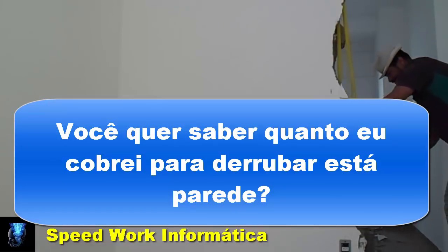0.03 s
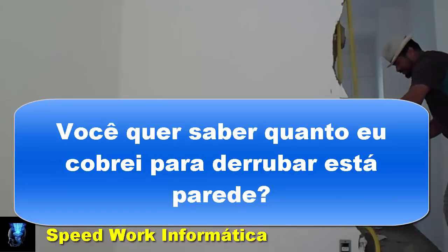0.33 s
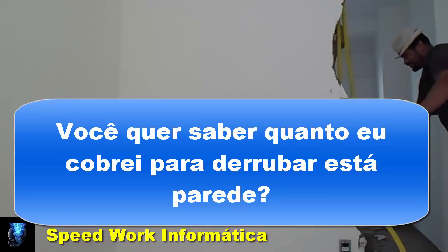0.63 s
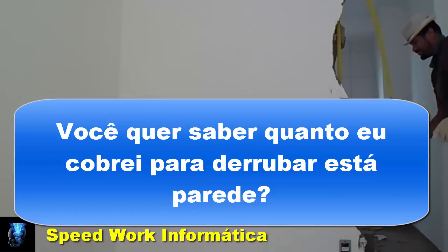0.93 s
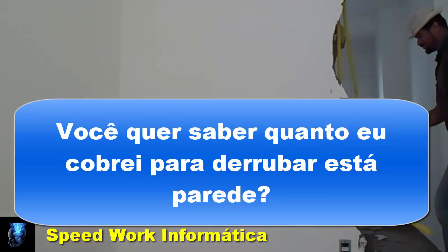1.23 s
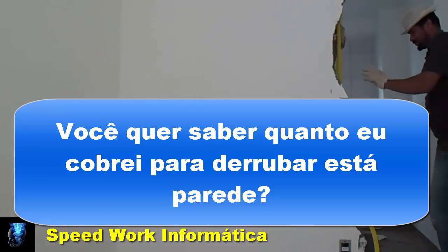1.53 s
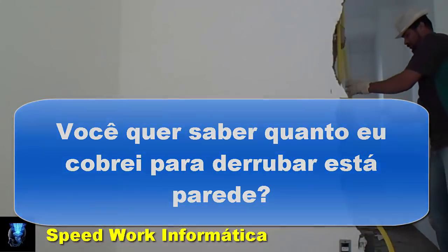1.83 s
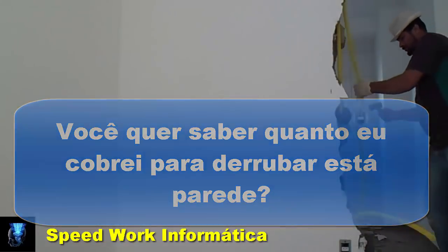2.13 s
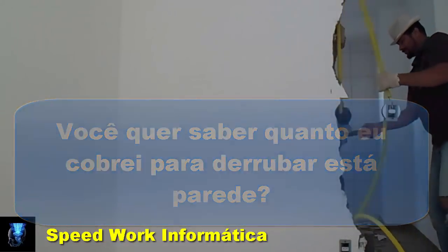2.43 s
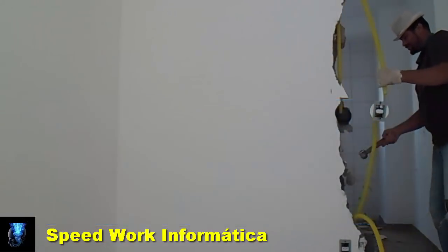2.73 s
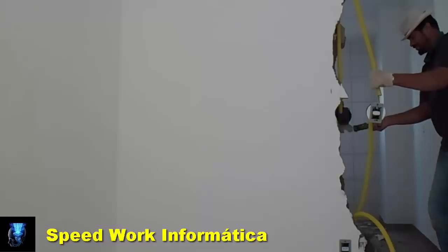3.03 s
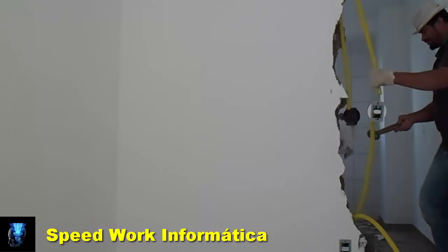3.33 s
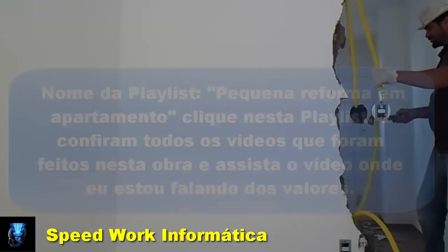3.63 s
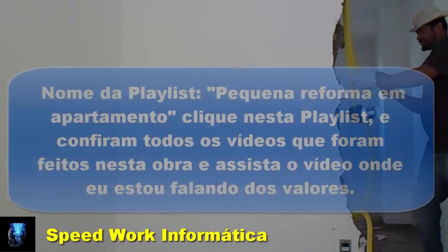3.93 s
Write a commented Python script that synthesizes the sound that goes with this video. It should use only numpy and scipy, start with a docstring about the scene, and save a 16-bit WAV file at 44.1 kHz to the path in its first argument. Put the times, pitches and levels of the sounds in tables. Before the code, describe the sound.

A hammer strikes a hollow brick wall a few times with booming thuds. After the blows, grit patters and clay shards clink onto the floor of a bare, echoing room. The heaviest hits overload the microphone.

```python
"""A bare, echoing room, where a hammer breaks through a hollow brick wall.
Each blow thuds in the wall, cracks the masonry and sets the room's standing waves booming.
Grit patters on the floor, shards of fired clay clink with their own ring, and lumps of mortar
land dully, all over the building's faint rumble. The heavy blows overload the microphone."""
import sys
import numpy as np
from scipy import signal
from scipy.fft import rfft, irfft, next_fast_len
from scipy.io import wavfile

SR = 44100
rng = np.random.default_rng(int(sys.argv[2]) if len(sys.argv) > 2 else 0)


def transcribe(signal):
    """Save signal, clipped to [-1, 1], as a 16-bit WAV file at the path in sys.argv[1]."""
    frames = np.atleast_2d(signal).T
    limited = np.clip(frames, -1, 1)
    pcm = np.round(limited * 32767).astype(np.int16)
    wavfile.write(sys.argv[1], SR, pcm)


N = 176400
LONG, SHORT = 3 * SR, SR // 3  # samples for a tail and for a hit
T = np.arange(LONG) / SR

# hammer blows (time [s], thud [dB], thud brightness [dB/octave], crack [dB],
# deep boom [dB], upper boom [dB])
HAMMER_BLOWS = [(-.12, -3.5, 1.5, -7, -24.5, -14.5), (.708, -13, .5, -10.5, -32, -22),
                (2.5202, 1.5, -0.4, -15, -21.5, -19), (3.214, -25.5, -1, -16.5, -29.5, -36)]
# resonances of wall and room that ring with every thud (frequency [Hz], level over the thud [dB])
THUD_MODES = [(148, -18), (222, -6), (280, -24), (340, -20), (495, -10.5), (555, -37), (593, -28),
              (751, -28), (974, -25)]
# the room's deep and upper standing waves (frequency [Hz], t60 [s])
BOOM_MODES = [(65, 3.23), (138, 2.95)]
# showers of grit, and brief bursts that are small cracks in the masonry (time [s], level [dB], length [s],
# direct over echo [dB])
GRIT_AND_CRACKS = [(.09, -32.5, .15, -20), (0.285, -25, 0.096, -17.5), (0.583, -30.5, 0.0079, -12),
                   (1.077, -27, 0.17, -20), (1.411, -34, 0.19, -3.5), (2.03, -56, .005, -13),
                   (2.191, -54, 0.06, 0), (2.46, -49, 0.037, -4), (2.621, -29.5, 0.11, -8),
                   (2.798, -29.5, 0.23, -8)]
# shards hitting the floor (time [s], level [dB], clatter length [s], first contact strength [0-1],
# direct over echo [dB], piece [name])
SHARD_LANDINGS = [(0.298, -19.5, 0.035, 0.44, -8, "wedge"), (0.92, -31.5, .02, 0.3, -17, "splinter"),
                  (1.029, -23.5, .01, 1, -10, "sliver"), (1.046, -19.5, 0.01, .45, -1.5, "flake"),
                  (1.107, -29, 0.0018, 1, -2, "crumb"), (1.147, -31, 0.024, 0.5, -12, "nib"),
                  (1.428, -40, 0.054, 0.3, -5, "chip"), (1.596, -34.5, .02, 0.94, -9, "crumb"),
                  (2.071, -53.5, .03, .5, -5, "speck"), (2.948, -11.5, 0.056, .6, -9, "slab"),
                  (3.536, -27.5, 0.0086, 1, -13.5, "chip"), (3.686, -20, .002, 1, -7.5, "crumb"),
                  (3.832, -18, 0.053, 0.56, -19, "half")]
# each piece's voice (ring t60 [s], contact noise over ring [dB], modes (frequency [Hz], level [dB]))
SHARD_VOICES = { "slab": (0.016, -2.4, [(1857, -16), (2640, -5.5), (2778, 0), (2930, -2), (3790, 2),
                (3962, -2), (4721, -6), (5157, 0), (5426, -0.5), (6450, -8), (6729, -6), (9356, -9),
                (10850, -4.5), (12100, -9), (13230, -16)]), "half": (.03, -1.6, [(1857, -1), (2729, -1.5),
                (3031, 1.5), (3790, 2), (3950, 0), (4242, 1), (4500, 0), (5157, 1), (6600, -2), (9700, -10),
                (10850, -3), (12050, -6)]), "wedge": (0.023, 2.4, [(2676, 2.5), (5389, 1), (6040, 6.5),
                (10030, 2)]), "sliver": (0.13, -2, [(2422, -5), (4258, -1), (5720, 1), (10240, -4),
                (11760, -8)]), "splinter": (0.091, -21, [(5760, 5), (10240, -1)]),
                "flake": (.012, -13, [(5800, 3.5), (6150, 1.5), (9851, -3), (10240, -1), (14000, -14)]),
                "nib": (0.13, -1.2, [(3693, 0), (4258, 2), (12320, -11)]),
                "crumb": (0.0045, -5.5, [(2350, -3), (3100, 0.5), (3800, -0.5), (4600, -6.5),
                (11000, -18.5), (12500, -12.5)]), "chip": (0.0054, -1.1, [(4650, 2.5), (5400, 4),
                (6750, 2.5), (9200, -2), (11200, -5.5)]), "speck": (0.11, -15, [(6535, 0), (9475, -3)])}
# lumps of mortar landing (time [s], level [dB])
MORTAR_LUMPS = [(1.41, -33), (2.46, -44.5), (3.61, -29.5), (3.69, -30.5)]
# dark body of a thud (frequency [Hz], level [dB])
THUD_EQ = [(20, -36), (50, -26), (100, -6.5), (140, -0.5), (230, -2), (400, -4), (650, -6), (1000, -13.5),
           (2000, -18.5), (4000, -27), (8000, -52), (16000, -45)]
# bright snap of masonry (frequency [Hz], level [dB])
CRACK_EQ = [(100, -3.5), (500, -15), (1000, 2), (1700, -1), (3000, 3), (4500, 4), (6500, 3), (9500, 1),
            (12000, -5), (16000, -12.5)]
# the building's low rumble (frequency [Hz], level [dB])
RUMBLE_EQ = [(20, -11), (65, 4), (130, -8.5), (400, -10), (1000, -18.5), (3000, -24), (9000, -26),
             (16000, -43)]
# crisp tick of one contact (frequency [Hz], level [dB])
TICK_EQ = [(100, -29), (700, -6), (2000, -4.5), (4500, -1), (6500, -2.5), (10000, -5.5), (13000, -11),
           (16000, -16)]
# the microphone's treble notch (frequency [Hz], gain [dB])
MIC_EQ = [(6900, 0), (7500, -4), (8000, -10), (8500, -4), (9100, 0)]
# decay of the room's echo (frequency [Hz], t60 [s])
ROOM_DECAY = [(60, 1.2), (140, 1.75), (300, 1.53), (700, 1.53), (1500, 1.364), (3000, 0.99), (6000, 0.76),
              (10000, 0.71), (16000, 1.33)]

THUD_T60_S, THUD_RING_T60_S, TILT_PIVOT_HZ = 0.094, 1.38, 400
SHUDDER_LEAD_S, SHUDDER_DB = 0.00233, -21
CONTACTS_PER_S, CONTACT_T60_S = 280, 0.0063
OVERLOAD_CEILING, OVERLOAD_HARDNESS, BAND_LIMIT_HZ = 0.57, 14, 15700


def amp(db):
    """Decibels to gain."""
    return 10 ** (np.asarray(db) / 20)


def unit(x):
    """Scale to an energy of 1."""
    return x / np.sqrt(np.sum(x ** 2) + 1e-20)


def curve_at(points, hz):
    """Read a curve of (Hz, value) points along a log frequency axis."""
    freqs, values = np.transpose(points)
    return np.interp(np.log(hz + 1), np.log(freqs + 1), values)


def fade(t, t60):
    """Exponential decay, 60 dB down at t60."""
    return amp(-60 * t / t60)


def equalise(x, eq, size=4096):
    """Minimum-phase EQ: nothing rings ahead of an attack."""
    cepstrum = irfft(np.log(amp(curve_at(eq, np.fft.rfftfreq(size, 1 / SR)))))
    cepstrum[1:size // 2] *= 2
    cepstrum[size // 2 + 1:] = 0
    return signal.fftconvolve(x, irfft(np.exp(rfft(cepstrum))))[:len(x)]


def whiten(noise):
    """Even out a burst's spectrum, roughly keeping its envelope."""
    spectrum = rfft(noise, 2 * SHORT)
    return irfft(spectrum / np.abs(spectrum))[:SHORT]


def echo(direct_db, build_s=0.0017):
    """The room's answer to a click: direct sound, then a diffuse tail with a decay for each band."""
    hz, t, bands = signal.stft(rng.standard_normal(LONG), SR, nperseg=512)
    bands = bands * fade(t, curve_at(ROOM_DECAY, hz)[:, None])
    tail = signal.istft(bands, SR, nperseg=512)[1][:LONG]
    response = unit(tail * (1 - np.exp(-T / build_s)))
    response[0] += amp(direct_db)
    return response


def in_room(x, room):
    """Play x through a room response, at rms 1 over the first tenth of a second."""
    heard = signal.fftconvolve(x, room)[:len(room)]
    return heard / np.sqrt(np.mean(heard[:SR // 10] ** 2))


def impact(eq, t60, direct_db):
    """An unpitched hit: a short puff of shaped noise with its echo."""
    puff = whiten(rng.standard_normal(SHORT) * fade(T[:SHORT], t60))
    return in_room(unit(equalise(puff, eq)), echo(direct_db))


def standing_wave(hz, t60, rise_s=0.011):
    """One resonance that swells and dies away."""
    tone = np.sin(2 * np.pi * (hz * T + rng.random()))
    return tone * fade(T, t60) * (1 - np.exp(-T / rise_s))


def add(track, time, x):
    """Mix x into the track at a time in seconds."""
    start = round(time * SR)
    x, start = x[max(-start, 0):], max(start, 0)
    track[start:start + len(x)] += x[:N - start]


def hammer():
    """Each blow layers the wall's ringing thud, the masonry's crack and the room's boom."""
    track = np.zeros(N)
    for time, thud_db, tilt, crack_db, *booms_db in HAMMER_BLOWS:
        tilted_eq = [(hz, db + tilt * np.log2(hz / TILT_PIVOT_HZ)) for hz, db in THUD_EQ]
        thud = impact(tilted_eq, THUD_T60_S, direct_db=-3)
        ring = sum(amp(db) * standing_wave(hz, THUD_RING_T60_S) for hz, db in THUD_MODES)
        add(track, time, amp(thud_db) * (thud + ring))
        # a faint shudder through the structure runs ahead of the airborne thud
        add(track, time - SHUDDER_LEAD_S, amp(thud_db + SHUDDER_DB) * thud)
        crack = impact(CRACK_EQ, t60=0.06, direct_db=-4.5)
        add(track, time, amp(crack_db) * crack)
        for (hz, t60), db in zip(BOOM_MODES, booms_db):
            add(track, time, amp(db) * standing_wave(hz, t60))
    return track


def building_rumble(rms_db=-45):
    """The building's faint, steady bed of low noise."""
    return amp(rms_db) * np.sqrt(N) * unit(equalise(rng.standard_normal(N), RUMBLE_EQ))


def clatter(length, first_strength):
    """Debris bouncing: a first contact, then random ones that grow weaker."""
    hits = rng.random(SHORT) < CONTACTS_PER_S / SR
    contacts = hits * rng.choice([-1, 1], SHORT) * rng.uniform(0.24, 1, SHORT)
    contacts *= np.exp(-(T[:SHORT] / length) ** 2)
    contacts[0] = first_strength
    return contacts


def ticks(contacts):
    """Every contact makes its own tiny crunch of noise."""
    power = signal.fftconvolve(contacts ** 2, fade(T[:SHORT], CONTACT_T60_S) ** 2)[:SHORT]
    crunch = rng.standard_normal(SHORT) * np.sqrt(np.abs(power))
    return unit(equalise(whiten(crunch), TICK_EQ))


def grit_and_cracks():
    """Grit patters on the floor in showers of ticks; the briefest bursts are small cracks in the masonry."""
    track = np.zeros(N)
    for time, db, length, direct_db in GRIT_AND_CRACKS:
        patter = ticks(clatter(length, first_strength=1))
        add(track, time, amp(db) * in_room(patter, echo(direct_db)))
    return track


def shards():
    """Pieces of fired clay land and clatter; each contact ticks and sets the piece ringing."""
    track, t = np.zeros(N), T[:SHORT]
    for time, db, length, first_strength, direct_db, piece in SHARD_LANDINGS:
        t60, crunch_db, modes = SHARD_VOICES[piece]
        contacts = clatter(length, first_strength)
        room = echo(direct_db)[:SR + SHORT]
        knocks = in_room(contacts, room)
        freqs, levels_db = np.transpose(modes)
        ring = np.zeros(len(room))
        for k, (hz, share) in enumerate(zip(freqs, unit(amp(levels_db)))):
            # alternating polarity keeps the modes from stacking into a spike
            partial = (-1) ** k * np.cos(2 * np.pi * hz * t) * fade(t, t60)
            ring += share * in_room(partial, knocks)
        crunch = amp(crunch_db) * in_room(ticks(contacts), room)
        clink = (ring + crunch) / np.hypot(1, amp(crunch_db))  # equal-power blend
        add(track, time, amp(db) * clink)
    return track


def mortar():
    """Lumps of mortar land with a dull thump and no ring."""
    track = np.zeros(N)
    for time, db in MORTAR_LUMPS:
        add(track, time, amp(db) * impact(THUD_EQ, t60=0.053, direct_db=-19))
    return track


def scene():
    """The mono mix that reaches the microphone."""
    return (hammer() + shards() + grit_and_cracks() + mortar() + building_rumble())[None]


def record(dry):
    """The microphone notches the treble, flattens the peaks and passes nothing above its band limit."""
    notched = equalise(dry[0], MIC_EQ)
    drive = np.abs(notched / OVERLOAD_CEILING)
    overloaded = notched / (1 + drive ** OVERLOAD_HARDNESS) ** (1 / OVERLOAD_HARDNESS)
    size = next_fast_len(N + SHORT)
    passband = np.fft.rfftfreq(size, 1 / SR) < BAND_LIMIT_HZ
    return irfft(rfft(overloaded, size) * passband, size)[None, :N]


dry = scene()
out = record(dry)
transcribe(out)
```